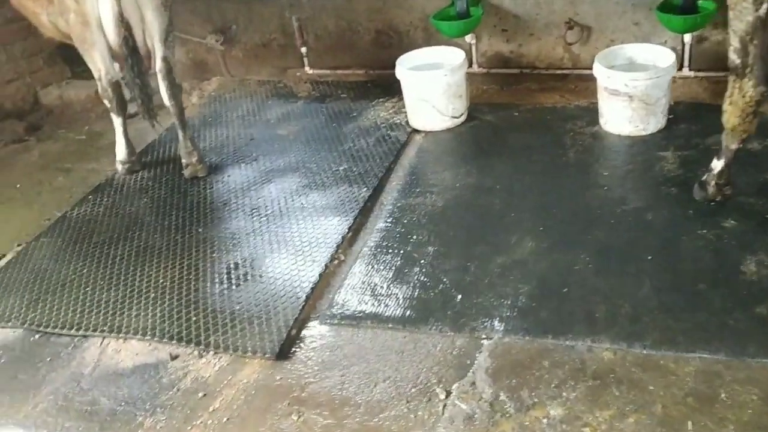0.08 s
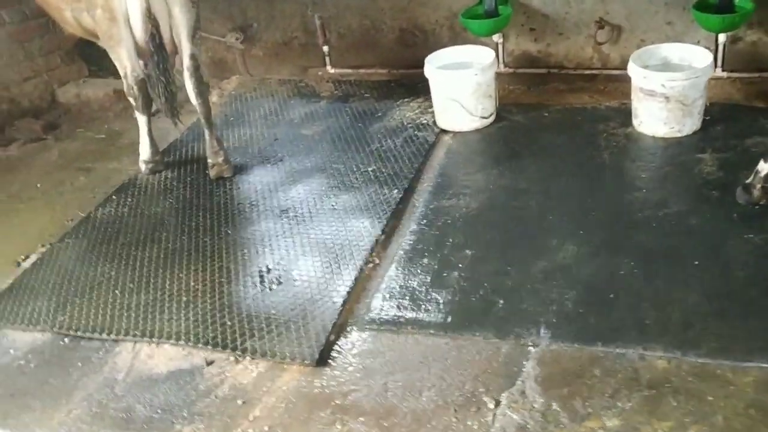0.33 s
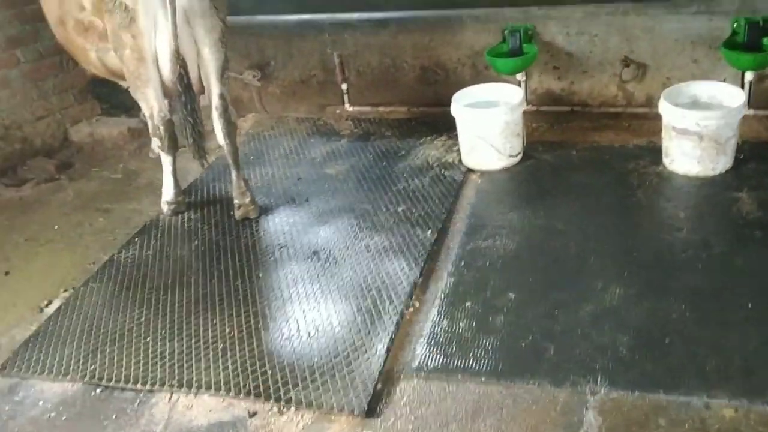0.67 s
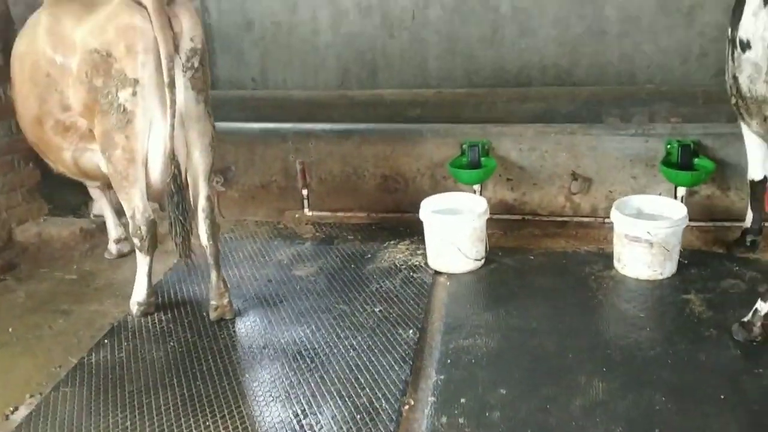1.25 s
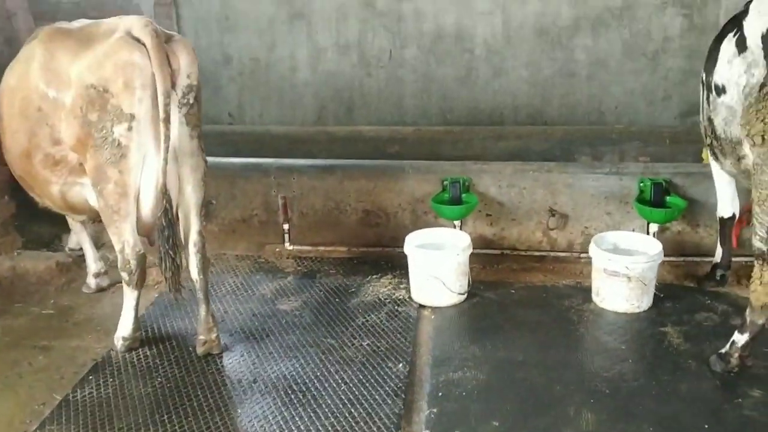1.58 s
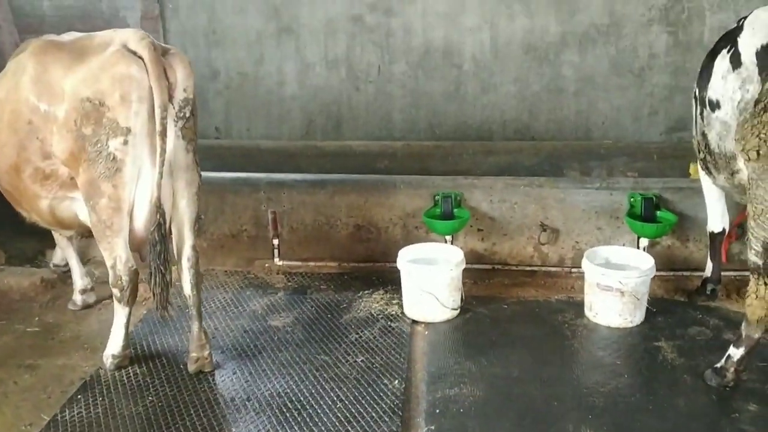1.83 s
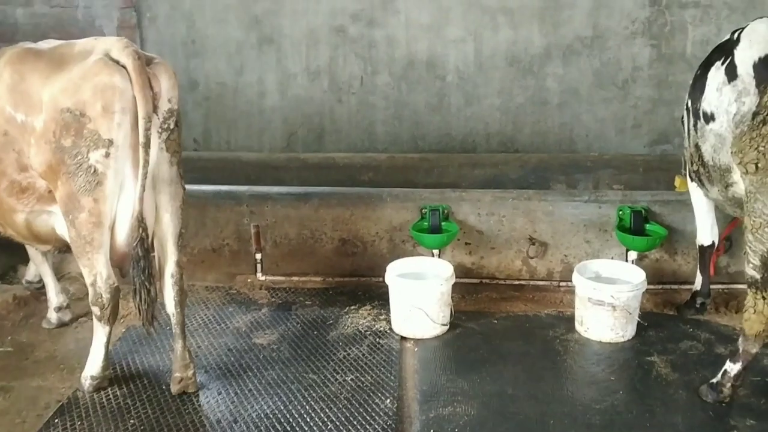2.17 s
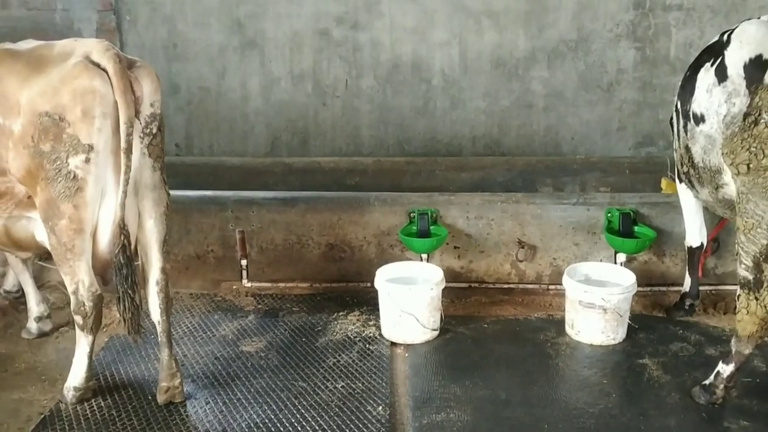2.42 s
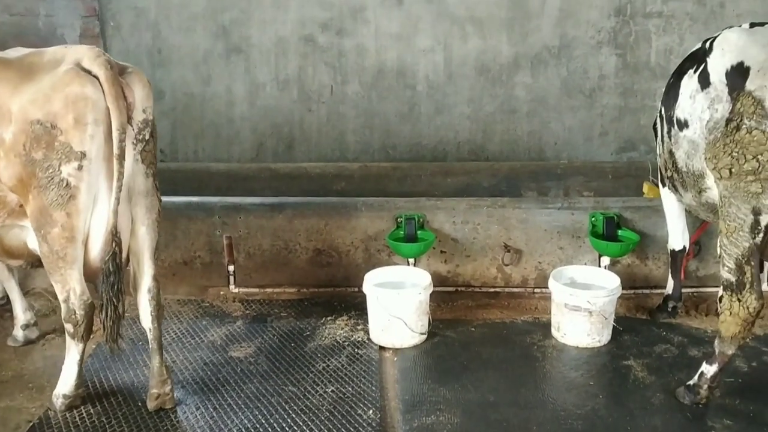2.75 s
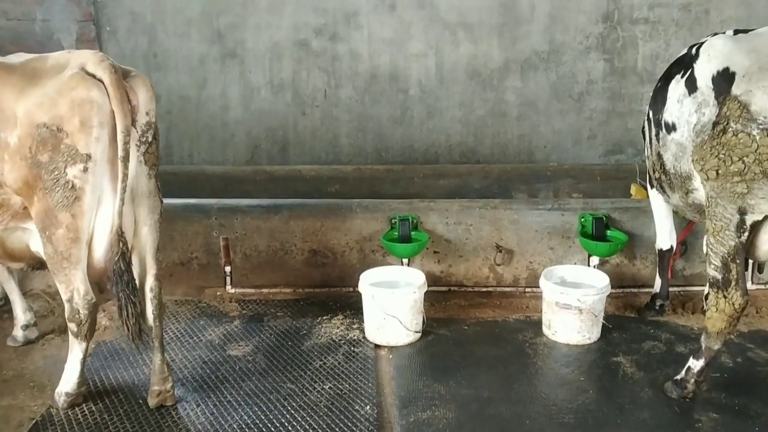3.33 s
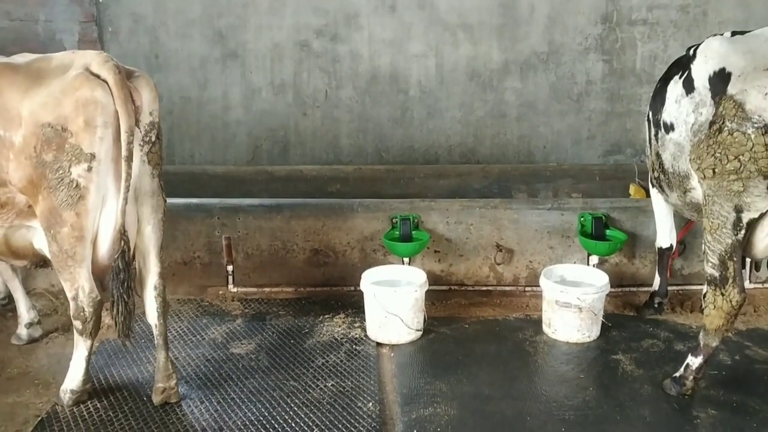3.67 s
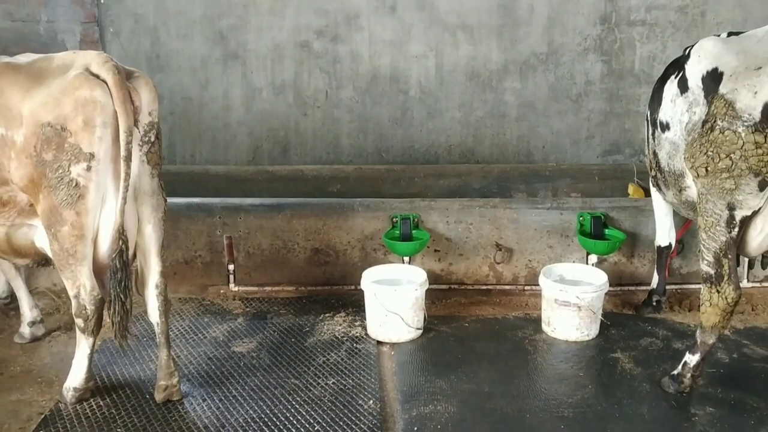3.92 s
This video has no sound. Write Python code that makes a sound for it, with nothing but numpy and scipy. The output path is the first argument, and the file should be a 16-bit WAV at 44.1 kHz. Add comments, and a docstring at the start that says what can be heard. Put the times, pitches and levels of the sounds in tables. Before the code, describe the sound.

A pump and fan run in a concrete cow barn, a throbbing low hum inside rushing air. Close wet scuffs, rustles, ticks and a metal clink come early, then the machinery fades away, leaving a soft hiss.

```python
"""A pump and a fan run in a concrete dairy barn: from the start, a throbbing low hum and higher multiples
of the shaft speed sit in a broad rush of air. Within the first second come soft rustles, three wet scuffs
on the floor close by, light ticks, a thin squeak and the clink of metal links. The whole din fades away,
the bass first, with two more ticks and two more rustles around the two-second mark.
Near the end a soft hiss comes forward."""
import sys
import numpy as np
from scipy import signal
from scipy.fft import rfft, irfft
from scipy.io import wavfile

SR = 44100
rng = np.random.default_rng(int(sys.argv[2]) if len(sys.argv) > 2 else 0)


def generate_wav(sig):
    """Save sig (samples, or channels by samples) to the path in sys.argv[1] as 16-bit PCM at SR."""
    pcm = np.round(np.clip(np.atleast_2d(sig).T, -1, 1) * 32767).astype(np.int16)
    wavfile.write(sys.argv[1], SR, pcm)


N = 176400
TIME = np.arange(N) / SR
BINS = np.maximum(np.arange(N // 2 + 1) * SR / N, 1)  # Hz

# Faders of the air rush. Each row: time in seconds, then bass, middle and treble in dB before their trims.
RUSH_FADERS = [(0, -23, -32.5, -40.5), (.42, -23, -32.5, -42.5), (.95, -26, -35.5, -41.5),
               (1.3, -27.5, -36, -45), (1.65, -32, -37.5, -47), (2.05, -35.5, -39.5, -47.5),
               (2.55, -39, -44.5, -52.5), (3.05, -42.5, -51.5, -57), (3.4, -52.5, -55, -63),
               (3.78, -55, -61.5, -67), (4, -62.5, -65, -73)]


def from_db(db):
    """Decibels to gain."""
    return 10 ** (np.asarray(db) / 20)


def unit_rms(x):
    """Scale to unit power."""
    return x / np.sqrt(np.mean(np.abs(x) ** 2) + 1e-20)


def in_time(rows):
    """Each column after the first as a curve in time."""
    seconds, *columns = np.transpose(rows)
    return [np.interp(TIME, seconds, column) for column in columns]


def in_frequency(rows):
    """Each column after the first as a curve over log frequency."""
    hz, *columns = np.transpose(rows)
    return [np.interp(np.log(BINS), np.log(hz), column) for column in columns]


def drift(rate_hz):
    """A smooth random wobble of unit power, mostly slower than the given rate."""
    return unit_rms(irfft(rfft(rng.standard_normal(N)) / (1 + (BINS / rate_hz) ** 2) ** 2, N))


def pan(db):
    """Channel gains that put the left so many dB above the right."""
    return from_db(np.array([[.5], [-.5]]) * db)


def tilted(eq, db_per_octave):
    """An EQ curve tipped brighter or darker."""
    return [(hz, db + db_per_octave * np.log2(hz)) for hz, db in eq]


def wide_noise(eq):
    """Noise shaped by an EQ curve, unrelated in the two channels."""
    return unit_rms(irfft(rfft(rng.standard_normal((2, N))) * from_db(in_frequency(eq)[0]), N))


def barn_noise(eq):
    """Fluttering noise: a direct part that reaches the left side late, and a diffuse part off the walls."""
    # Stereo image. Each row: frequency in Hz, direct share of the power from 0 to 1, left over right in dB.
    image = [(60, 1, 1), (210, 0.63, -1), (340, 0.79, 1.5), (645, 0.4, 0.5), (830, 0.41, 0),
             (1230, 0.47, 2.5), (2460, 0.09, 4.5), (5000, 0.12, 4), (7400, 0, 6), (12900, 0.2, -1.5)]
    # Lag of the direct sound. Each row: frequency in Hz, delay on the left in seconds.
    left_lag = [(200, 0.00024), (600, 0.00029), (1000, 0.00042), (2200, 0.00049)]
    share, balance_db = in_frequency(image)
    delay_s = in_frequency(left_lag)[0] * np.array([[1], [0]])
    direct = rfft(rng.standard_normal(N)) * np.exp(-2j * np.pi * BINS * delay_s)
    diffuse = rfft(rng.standard_normal((2, N)))
    spectrum = (np.sqrt(share) * direct + np.sqrt(1 - share) * diffuse) * pan(balance_db)
    flutter = from_db(1.13 * drift(rate_hz=3.6))
    return unit_rms(irfft(spectrum * from_db(in_frequency(eq)[0]), N)) * flutter


def tone(hz, roughness, width_hz, left_lag_s=0.00024):
    """A tone whose strength and phase waver."""
    waver = unit_rms(1 + roughness * (drift(width_hz) + 1j * drift(width_hz)))
    turns = hz * (TIME - np.array([[left_lag_s], [0]])) + rng.random()
    return np.sqrt(2) * np.real(waver * np.exp(2j * np.pi * turns))


def ring(clicks, hz, t60):
    """Each click sets a dying sine ringing."""
    radius = from_db(-60 / (t60 * SR))
    angle = 2 * np.pi * hz / SR
    return signal.lfilter([0, np.sin(angle)], [1, -2 * radius * np.cos(angle), radius ** 2], clicks + 1e-18)


def swells(rows):
    """An envelope of bell-shaped rises and falls."""
    return sum(from_db(db) * np.exp(-(2 * (TIME - centre) / length) ** 2) for centre, db, length in rows)


def burst(start, rise, t60):
    """An envelope with a rounded attack and an exponential tail."""
    age = TIME - start
    attack = np.sin(np.pi / 2 * np.clip(age / rise, 0, 1)) ** 2
    return attack * np.exp(-np.log(1000) * np.clip((age - rise) / t60, 0, 2))


def building_drone():
    """The faint, deep drone of the building, the dull bottom of the din."""
    # Fade of the drone. Each row: time in seconds, level in dB.
    fader = [(0, -40), (1.2, -47), (2.2, -51.5), (3, -58.5), (3.7, -63.5), (4, -72)]
    # Its dark colour. Each row: frequency in Hz, relative level in dB.
    eq = [(25, -35), (45, -35), (62, -25), (95, -17.5), (125, -9), (160, 2), (200, 1), (300, -30.5)]
    return from_db(in_time(fader)[0]) * barn_noise(eq)


def air_rush():
    """The fan's rush in three layers: duct rumble, moving air and its hiss."""
    # Colours of the three layers. Each row: frequency in Hz, relative level in dB.
    rumble_eq = [(100, -54), (160, -24.5), (185, -4.5), (210, -2), (255, 0), (295, -4.5), (345, 2),
                 (385, -1.5), (440, -6), (520, -7.5), (750, -67)]
    air_eq = [(80, -60), (250, -3.5), (450, 0.5), (560, 3), (780, 4), (1000, 2), (1550, -2.5), (2300, -4),
              (3200, -10), (4500, -40.5)]
    hiss_eq = [(200, -60), (1800, -1), (3000, 3.5), (4100, 5.5), (5700, 2), (7500, -5), (10000, -8),
               (11300, -8), (12300, -17), (14500, -28), (15500, -43)]
    bass_db, middle_db, treble_db = in_time(RUSH_FADERS)
    rumble = from_db(bass_db - 6.5) * barn_noise(rumble_eq)
    air = from_db(middle_db + 2.5) * barn_noise(air_eq)
    hiss = from_db(treble_db + 3) * barn_noise(hiss_eq)
    return rumble + air + hiss


def duct_resonances():
    """Moving air stirs a few narrow resonances of the duct."""
    # Each row: pitch in Hz, width in Hz, starting level in dB over the bass fader, change in dB per second.
    modes = [(198.8, 8.3, -26, 3.5), (219.2, 22, -10, -1.5), (242.9, 4.6, -18.5, -0.5),
             (266.3, 7.5, -20, 3.5), (322.2, 6.1, -11.5, -9)]
    bass_db = in_time(RUSH_FADERS)[0]
    out = 0
    for hz, width_hz, db, slope in modes:
        ringing = irfft(rfft(rng.standard_normal(N)) / (1 + ((BINS - hz) / width_hz) ** 2) ** 2, N)
        out += from_db(bass_db + db + slope * TIME) * unit_rms(ringing)
    return out


def pump_hum(shaft_hz=30.5):
    """The pump hums at multiples of its shaft speed; the lowest throbs unevenly, about six times a second."""
    # Beds under the two main hums. Each row: time in seconds, low hum in dB, upper hum in dB.
    beds = [(0, -38, -31.5), (.17, -46, -32.5), (.6, -40.5, -28), (.9, -43, -35), (1.1, -48, -38),
            (1.55, -55, -37.5), (2.1, -44, -58), (2.85, -51.5, -53.5), (3.4, -59.5, -59.5), (4, -59.5, -99)]
    # Throbs of the low hum, swells of the upper. Each row: centre in seconds, level in dB, length in seconds.
    throbs = [(.06, -32, .04), (.14, -37, 0.056), (.26, -27.5, 0.033), (0.352, -22, 0.031),
              (0.442, -25.5, 0.08), (.61, -30, 0.053), (0.7, -33, .07), (.83, -24, 0.017),
              (.89, -28, 0.063), (1.008, -22.5, 0.057), (1.09, -35, 0.079), (1.18, -28.5, 0.16),
              (1.335, -29.5, 0.05), (1.45, -31, 0.16), (1.595, -28.5, 0.092), (1.665, -30.5, 0.028),
              (1.80, -35.5, 0.12), (1.935, -37.5, 0.046), (2.09, -60, 0.074), (2.41, -40.5, 0.045),
              (2.596, -45.5, 0.15), (2.69, -40, 0.027), (2.882, -43.5, .11), (3.06, -43, 0.044),
              (3.244, -45.5, 0.057), (3.455, -47, 0.026), (3.57, -51, 0.069)]
    upper_swells = [(.19, -28.5, 0.14), (.385, -27.5, 0.062), (.48, -34, 0.15), (.605, -29, 0.053),
                    (1.05, -36, .14), (1.51, -44, 0.083)]
    # Weaker harmonics. Each row: starting level in dB over the middle fader, change in dB per second.
    weak_levels = [(-24.5, 4.5), (-12.5, 0), (-10.5, -6), (-9.5, -1.5), (-21.5, 2), (-19.5, 2)]
    weak_orders = (13, 15, 16, 19, 20, 22)
    low_db, upper_db = in_time(beds)
    middle_db = in_time(RUSH_FADERS)[1]
    low = (from_db(low_db) + swells(throbs)) * tone(7 * shaft_hz, roughness=.16, width_hz=14)
    upper = (from_db(upper_db) + swells(upper_swells)) * tone(12 * shaft_hz, roughness=.16, width_hz=12)
    weak = sum(from_db(middle_db + db + slope * TIME) * tone(order * shaft_hz, roughness=.4, width_hz=5)
               for order, (db, slope) in zip(weak_orders, weak_levels))
    return low * pan(db=-2) + upper + weak


def rustles():
    """Something brushes softly nearby: short swells of noise, two darker and later two brighter."""
    # Each row: centre in seconds, level in dB, length in seconds, tilt in dB per octave.
    brushes = [(0.266, -40, 0.1, -3.5), (0.498, -42.5, 0.097, -5.5), (2.127, -51.5, .06, 5),
               (2.338, -43, 0.073, 5.5)]
    # Colour before the tilt. Each row: frequency in Hz, relative level in dB.
    eq = [(200, -50), (1500, -18), (3000, 10.5), (6000, 0), (9000, -5), (15500, -19)]
    return pan(db=6.5) * sum(swells([(centre, db, length)]) * wide_noise(tilted(eq, tilt))
                             for centre, db, length, tilt in brushes)


def droplets(pops_per_s=1500, pitches=24, ring_cycles=16):
    """Tiny droplets pop at random and ring briefly, spread over many high pitches."""
    out = 0
    for hz in np.geomspace(3900, 14500, pitches):
        pops = (rng.random((2, N)) < pops_per_s / pitches / SR) * rng.standard_normal((2, N))
        out += ring(pops, hz, t60=ring_cycles / hz)
    return unit_rms(out)


def wet_scuffs():
    """Short grainy swishes on the wet floor, each with its own brightness, and the droplets they stir."""
    # Each row: start in seconds, level in dB, attack in seconds, 60 dB decay in seconds,
    # left over right in dB, tilt in dB per octave.
    strokes = [(.29, -43, 0.0087, 0.11, -1, 6), (.745, -34.5, 0.021, 0.44, 4.5, 1.5),
               (.874, -28, 0.017, 0.32, 2.5, 2.1)]
    # Colour of the swish before the tilt. Each row: frequency in Hz, relative level in dB.
    eq = [(700, -12), (1500, 9), (2500, 9.5), (4000, 9), (6300, 7.5), (9000, 4), (12000, -1.5), (15500, -1)]
    spatter = from_db(-6.5) * droplets()
    grain = unit_rms(from_db(0.5 * drift(rate_hz=330)))
    out = 0
    for start, db, rise, t60, side_db, tilt in strokes:
        swish = grain * wide_noise(tilted(eq, tilt))
        out += from_db(db) * burst(start, rise, t60) * pan(side_db) * (swish + spatter)
    return out


def ticks():
    """Light contacts off to the left, each a snap of bright noise."""
    # Each row: start in seconds, level in dB.
    contacts = [(.731, -34.5), (0.739, -35), (.781, -40), (0.88, -30), (1.744, -42.5), (2.096, -43)]
    # Colour of a tick. Each row: frequency in Hz, relative level in dB.
    eq = [(2500, -31), (5000, 4), (7200, 6), (8500, -1), (11000, -33)]
    envelope = sum(from_db(db) * burst(start, rise=0.00033, t60=0.033) for start, db in contacts)
    return envelope * wide_noise(eq) * pan(db=10.5)


def squeak():
    """A thin, wavering high tone between the last two scuffs."""
    # Each row: centre in seconds, level in dB, length in seconds.
    swell = [(.81, -43.5, 0.13)]
    return swells(swell) * tone(hz=3290, roughness=0.91, width_hz=63)


def link_clinks(scatter_db=2.5, detune=.006):
    """Metal links knock together in the loudest scuff, each ringing at a slightly different pitch."""
    # Each row: start in seconds, strength in dB.
    knocks = [(.885, -46), (.889, -43), (0.892, -39), (.901, -45), (0.916, -48)]
    # Modes of a link. Each row: pitch in Hz, relative level in dB, 60 dB decay in seconds.
    modes = [(2430, -4, .05), (3160, -12, .05), (6000, 3, .14), (6490, -8, .16), (8465, -2, .16),
             (9600, -9, 0.18), (11840, 3, .14), (12790, -10, .14)]
    out = np.zeros((2, N))
    for start, db in knocks:
        impulse = np.zeros(N)
        impulse[int(start * SR)] = from_db(db)
        for hz, mode_db, t60 in modes:
            strength = from_db(mode_db + scatter_db * rng.standard_normal((2, 1)))
            polarity = rng.choice([-1, 1], (2, 1))
            detuned_hz = hz * (1 + detune * rng.standard_normal())
            out += strength * polarity * ring(impulse, detuned_hz, t60)
    return out * pan(db=3)


def late_hiss():
    """A soft band of hiss, buried at first, comes forward as the din dies down."""
    # Rise and fall of the hiss. Each row: time in seconds, level in dB.
    fader = [(0, -57), (2.7, -50.5), (3.2, -50.5), (3.5, -56.5), (3.78, -56), (4, -68)]
    # Its colour. Each row: frequency in Hz, relative level in dB.
    eq = [(150, -70), (900, -12), (1700, -8), (2400, -2.5), (3200, -10), (4200, -14), (7000, -33.5)]
    return from_db(in_time(fader)[0]) * barn_noise(eq) * pan(db=3)


def scene():
    """The fading bed of air and machinery, with the small close sounds on top."""
    bed = building_drone() + air_rush() + duct_resonances() + late_hiss() + pump_hum()
    return bed + wet_scuffs() + squeak() + rustles() + ticks() + link_clinks()


def record(dry, fade_in_s=.003, cutoff_hz=15550):
    """A very short fade-in, then a steep low-pass on the top end."""
    fade_in = np.minimum(TIME / fade_in_s, 1)
    low_pass = signal.ellip(12, .1, 80, cutoff_hz, fs=SR, output="sos")
    return signal.sosfilt(low_pass, dry * fade_in)


dry = scene()
out = record(dry)
generate_wav(out)
```